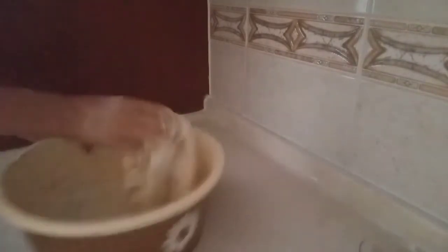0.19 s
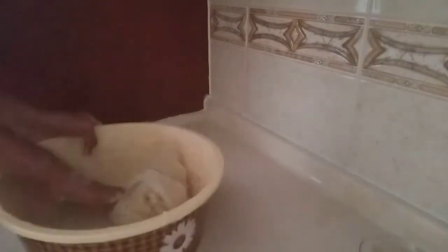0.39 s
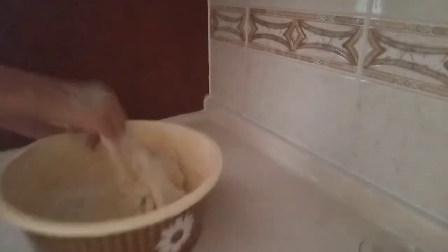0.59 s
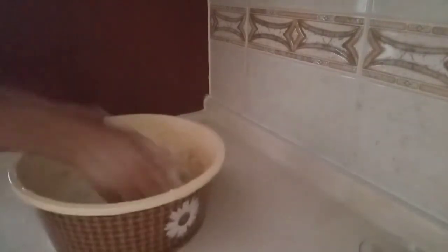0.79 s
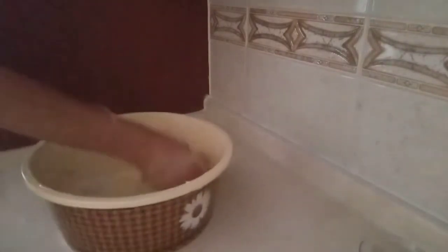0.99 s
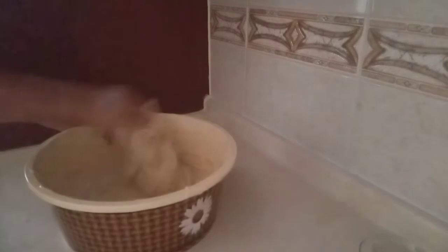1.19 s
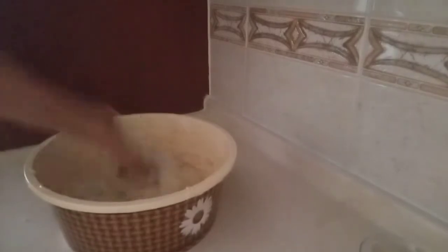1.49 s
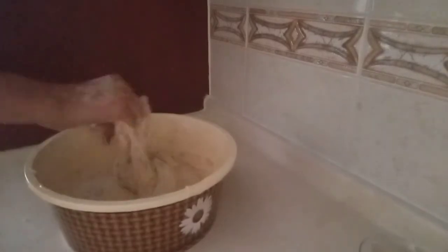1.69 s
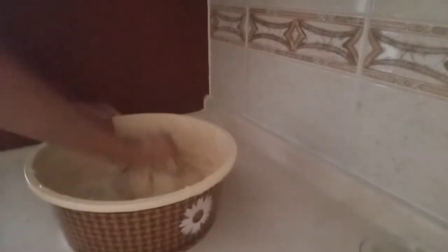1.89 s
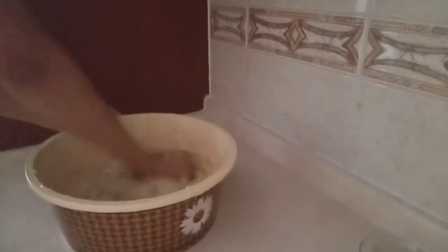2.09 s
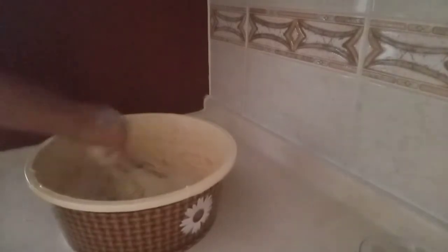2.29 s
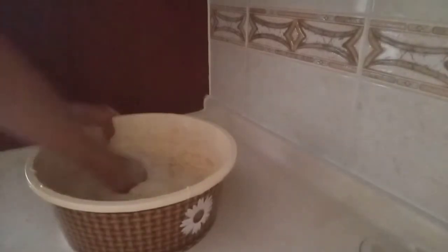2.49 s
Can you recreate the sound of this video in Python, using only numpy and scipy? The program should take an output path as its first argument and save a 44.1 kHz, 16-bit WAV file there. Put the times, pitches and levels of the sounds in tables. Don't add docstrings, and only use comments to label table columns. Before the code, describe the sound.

Hands knead sticky dough in a plastic bowl that knocks hard once on a kitchen counter

```python
import sys
import numpy as np
from scipy import signal
from scipy.fft import rfft, irfft
from scipy.io import wavfile
from scipy.ndimage import uniform_filter1d

SR = 44100
rng = np.random.default_rng(int(sys.argv[2]) if len(sys.argv) > 2 else 0)


def decibels_to_gain(level_db):
    exponent = np.asarray(level_db, float) / 20
    return 10 ** exponent


def dump_mix(stems):
    frames = np.atleast_2d(stems).T
    limited = np.clip(frames, -1, 1)
    pcm = np.round(limited * 32767).astype(np.int16)
    wavfile.write(sys.argv[1], SR, pcm)


N = 114660

# (frequency [Hz], level [dB], t60 [s])
WALL_MODES = [(380.4, -10, 0.13), (417.6, -8, 0.15), (465.4, -10.5, 0.11), (508, -9, 0.1), (563, -9, 0.1),
              (618.7, -7, 0.07), (711.8, -7, 0.13), (864.8, -1.5, 0.079), (900, -4, 0.05), (951, -5, 0.057),
              (1135, -7, 0.035), (1393, -9.5, 0.05), (1668, -7, 0.035), (1990, -6, 0.037)]
# (frequency [Hz], level [dB], t60 [s])
BASE_MODES = [(82.5, -8.5, 0.22), (96.7, -9.5, .15), (116.3, -1, 0.2), (174.05, -3.5, 0.2), (259, -16, 0.2),
              (323.7, -14.5, 0.076)]


def unit(x):
    return x / np.sqrt(np.mean(x ** 2))


def colour(x, points):
    hz, db = np.array(points, float).T
    freqs = np.fft.rfftfreq(len(x), 1 / SR)
    gain = decibels_to_gain(np.interp(np.log(freqs + 1), np.log(hz), db))
    return irfft(rfft(x) * gain, len(x))


def toned(x, points):
    return colour(x, points) / np.std(colour(rng.standard_normal(N), points))


def through(x, response):
    return signal.fftconvolve(x, response)[:N]


def walk(rate):
    hold = int(SR / rate)
    steps = np.repeat(rng.standard_normal(N // hold + 1), hold)
    return unit(uniform_filter1d(steps, hold)[:N])


def swell(t, start, rise, fall):
    u = t - start - rise
    rising = np.clip(1 + u / rise, 0, 1) ** 0.68
    falling = np.exp(-(np.maximum(u, 0) / fall) ** 1.104 * 2.24)
    return np.where(u < 0, rising, falling)


def grains():
    level_db = 2 * rng.exponential(size=N) + 1.5 * walk(49)
    return unit(rng.standard_normal(N) * decibels_to_gain(level_db))


def patches():
    crackle = grains()
    total = 0
    for hz in 500 * 1.5 ** np.arange(10):
        edges = [(hz / 1.5, -40), (hz / 1.2, 0), (hz * 1.2, 0), (hz * 1.5, -40)]
        total = total + colour(crackle, edges) * decibels_to_gain(3 * walk(35))
    return unit(total)


def ring(modes, flip):
    t = np.arange(SR // 2) / SR
    total = 0
    for k, (hz, db, t60) in enumerate(modes):
        sign = (-1) ** (k * flip)
        total = total + sign * decibels_to_gain(db - 60 * t / max(t60, .005)) * np.sin(2 * np.pi * hz * t)
    return total


def kitchen():
    # (frequency [Hz], level [dB per Hz])
    spectrum = [(20, -12), (60, -13), (108, 0.5), (170, -8.5), (400, -9), (2600, -26.5), (5310, -42.5),
                (15500, -51.5)]
    level_db = -68 + 1.8 * walk(6)
    return decibels_to_gain(level_db) * unit(colour(rng.standard_normal(N), spectrum))


def bird(t):
    u = np.clip((t - 1.83) / .08, 0, 1)
    pitch_hz = 5950 + 25 * walk(300)
    level = decibels_to_gain(-88 + 2.9 * walk(200)) * np.sin(np.pi * u ** 2)
    return level * np.sin(2 * np.pi * np.cumsum(pitch_hz) / SR)


def tick(t):
    return decibels_to_gain(-68) * np.exp(-((t - 2.519) / .0015) ** 2) * np.sin(2 * np.pi * 4200 * t)


def room():
    # (frequency [Hz], t60 [s])
    decay = [(550, 0.43), (900, 0.46), (2000, 0.29), (4500, 0.51), (10000, 0.15)]
    gap_s = 0.0063
    t = np.arange(SR // 2) / SR
    tail = 0
    for hz, t60 in decay:
        edges = [(hz / 2.5, -30), (hz / 2.2, 0), (hz * 1.2, 0), (hz * 5.6, -30)]
        band = colour(rng.standard_normal(len(t)), edges)
        tail = tail + band * decibels_to_gain(-60 * t / t60) / np.sqrt(t60 * SR / 14)
    tail = tail * decibels_to_gain(-8) * np.clip(t / gap_s - 1, 0, 1)
    tail[0] = 1
    return tail


def rub(force, modes, flip):
    return through(force * grains(), unit(ring(modes, flip)) / np.sqrt(SR // 2))


def drags(t):
    # (start [s], rise [s], fall [s], wall level [dB], base level [dB])
    strokes = [(-.05, 0.027, 0.11, -51.5, -43), (0.048, 0.06, 0.067, -57.5, -78),
               (.4, 0.035, 0.074, -81, -41), (0.617, 0.011, 0.1, -46.5, -54.5),
               (0.825, 0.12, 0.11, -86.5, -54), (.9, 0.025, 0.038, -70, -48),
               (1.03, 0.053, 0.38, -70.5, -67), (1.253, 0.0076, 0.08, -53, -48),
               (1.275, 0.054, 0.11, -55, -43), (1.35, 0.014, 0.043, -49, -56),
               (1.4, 0.029, 0.068, -57.5, -60), (1.55, 0.049, 0.042, -66.5, -91.5),
               (1.908, 0.025, 0.089, -59.5, -55), (1.978, 0.023, 0.076, -58, -70),
               (2.099, 0.026, 0.26, -67, -60), (2.428, 0.011, 0.076, -78.5, -49.5),
               (2.57, 0.017, 0.053, -63, -48)]
    wall = sum(decibels_to_gain(wall_db) * swell(t, s, rise, fall) for s, rise, fall, wall_db, _ in strokes)
    base = sum(decibels_to_gain(base_db) * swell(t, s, rise, fall) for s, rise, fall, _, base_db in strokes)
    return rub(wall, WALL_MODES, flip=True) + rub(base, BASE_MODES, flip=False)


def judders(t):
    # (start [s], rise [s], fall [s], level [dB], frequency [Hz])
    tones = [
        (.594, .008, .08, -42, 378),
        (.688, .012, .03, -48, 570),
        (.69, .02, .05, -46, 395),
        (.735, .035, .012, -45, 390),
        (1.268, .006, .012, -44, 880),
        (1.355, .005, .03, -41, 575),
        (1.384, .006, .03, -38, 730),
        (2.068, .005, .02, -40, 410),
        (2.09, .01, .06, -50, 500),
        (2.419, .004, .04, -46, 600),
    ]
    turn = 2 * np.pi * np.cumsum(1 + .06 * walk(260)) / SR
    flutter = decibels_to_gain(2.5 * walk(70.96))
    total = sum(decibels_to_gain(db) * swell(t, s, rise, fall) * np.sin(hz * turn) for s, rise, fall, db, hz in tones)
    return signal.sosfilt(signal.butter(4, 1300, fs=SR, output="sos"), flutter * total)


def smears(t):
    # (start [s], rise [s], fall [s], hiss level [dB], brightness [dB])
    strokes = [(-.1, .17, 0.54, -53, -3), (0.191, 0.079, 0.042, -52.5, -4),
               (0.252, 0.024, 0.025, -54, -6.5), (0.351, 0.0087, 0.04, -45.5, -7.5),
               (0.452, 0.21, 0.25, -55.5, -1), (0.606, 0.11, .06, -54, -2.5), (.71, 0.013, 0.017, -83, -15),
               (0.83, 0.026, 0.44, -52.5, -7.5), (0.897, 0.057, 0.097, -48.5, -0.5),
               (1.032, 0.097, 0.2, -64.5, -9), (1.248, 0.091, 0.088, -52.5, -8),
               (1.388, 0.016, 0.042, -53.5, 9), (1.493, 0.0226, 0.023, -61.5, 9.5),
               (1.53, 0.0277, 0.058, -70.5, 17.5), (1.898, 0.02, 0.028, -61, 11),
               (1.916, 0.036, 0.037, -58, 13.5), (1.973, 0.0095, 0.051, -54.5, -4.5),
               (2.06, 0.019, 0.027, -60.5, 0), (2.091, 0.042, 0.046, -64, 4), (2.139, 0.022, 0.15, -62, 3),
               (2.39, 0.043, 0.057, -60.5, 0), (2.473, 0.028, 0.15, -76.5, 6), (2.587, 0.0184, .05, -66, 3)]
    # (frequency [Hz], level [dB per Hz])
    spectrum = [(290, -41), (500, -4), (577, -3), (1170, -5), (2070, -9.5), (3580, -14), (5750, -29),
                (8720, -32.5), (15500, -36.5)]
    split_hz = 4140
    body = sum(decibels_to_gain(db) * swell(t, s, rise, fall) for s, rise, fall, db, _ in strokes)
    air = sum(decibels_to_gain(db + lift_db) * swell(t, s, rise, fall) for s, rise, fall, db, lift_db in strokes)
    low = signal.sosfilt(signal.butter(2, split_hz, "low", fs=SR, output="sos"), body * patches())
    high = signal.sosfilt(signal.butter(2, split_hz, "high", fs=SR, output="sos"), air * patches())
    return toned(low + high, spectrum)


def burst(t, start, db, t60, rise):
    return decibels_to_gain(db - 60 * np.maximum(t - start, 0) / t60) * np.clip((t - start) / rise, 0, 1)


def slaps(t):
    # (time [s], level [dB], t60 [s])
    hits = [
        (0.2245, -32, 0.04),
        (.362, -52, .05),
        (0.832, -59, .04),
        (0.885, -47, 0.045),
        (1.245, -65, .03),
        (1.312, -56.5, 0.032),
        (1.386, -35, 0.061),
        (2.151, -63.5, 0.07),
    ]
    # (frequency [Hz], level [dB per Hz])
    spectrum = [(590, -41), (1000, -23), (1660, -16), (1880, -7.5), (3740, -5.5), (5150, -18),
                (9250, -30.5), (15500, -44)]
    rise_s = .002
    envelope = 0
    for s, db, t60 in hits:
        echo = burst(t, s, db - 17, .35, rise_s)
        envelope = envelope + burst(t, s, db, t60, rise_s) + echo
    return toned(envelope * rng.standard_normal(N), spectrum)


def knock(t):
    # (frequency [Hz], level [dB per Hz])
    spectrum = [(110, -41.5), (300, -19), (480, -11), (920, -3), (1300, -11.5), (2100, -10), (3500, -31.5),
                (12000, -85)]
    start_s, level_db, rise_s = .2256, -13.5, .0005
    envelope = burst(t, start_s, level_db, .12, rise_s)
    envelope = envelope + burst(t, start_s, level_db - 7.5, 0.42, rise_s)
    return toned(envelope * rng.standard_normal(N), spectrum)


def struck_wall(wall_db, contact_ms):
    modes = []
    for hz, db, t60 in WALL_MODES:
        struck_hz = hz * (1 + .01 * rng.standard_normal())
        struck_db = db + wall_db + 2 * rng.standard_normal()
        damped_t60 = min(t60, 130 / hz) / (1 + .5 * contact_ms)
        modes.append((struck_hz, struck_db, damped_t60))
    wall = ring(modes, flip=True)
    k = np.arange(900)
    rattle = decibels_to_gain(-23.5) * rng.standard_normal(900) * np.exp(-k / SR / 0.0049)
    rattle[0] += 1
    return signal.fftconvolve(wall, rattle)[:len(wall)]


def struck_base(base_db, contact_ms):
    modes = []
    for hz, db, t60 in BASE_MODES:
        tilt_db = 2.5 * np.log2(hz / 150) / max(contact_ms, .2)
        modes.append((hz, db + base_db + 2 * rng.standard_normal() + tilt_db, t60))
    return ring(modes, flip=False)


def blows():
    # (time [s], base level [dB], wall level [dB], contact [ms])
    hits = [(0.2255, -20, -8.5, 0.21), (.2405, -50, -14.5, 0.44), (.276, -31, -19.5, 0.65),
            (.303, -53, -21, 0.26), (.327, -40.5, -33, 0.19), (.356, -50, -29, 0.4),
            (.371, -25.5, -28.5, 1.76), (.597, -54.5, -39, 0.89), (0.833, -48.5, -62, 3.0),
            (0.849, -50, -72, 7.6), (0.873, -30.5, -22, 2.63), (.886, -66, -33, 0.12),
            (0.942, -46, -70, 0.21), (.927, -41, -44.5, 1.16), (1.272, -50.5, -41.5, 1.28),
            (1.314, -38, -64, 6.9), (1.359, -35.5, -38.5, 1.1), (1.38, -36, -43.5, 1.26),
            (1.387, -49, -36, 0.66), (1.429, -40, -47, 1.64), (1.907, -57.5, -57, 2.2),
            (1.945, -40.5, -63, 3.9), (1.994, -39, -38.5, 2.3), (2.067, -33.5, -27, 1.86),
            (2.083, -59, -33.5, 1.74), (2.102, -53, -52, 2.1), (2.122, -52, -58, 3.5),
            (2.138, -42.5, -39, 2.5), (2.419, -41.5, -38, 1.43), (2.472, -68.5, -66.5, 1.55),
            (2.573, -37.5, -41.5, 1.18)]
    out = np.zeros(N)
    for s, base_db, wall_db, contact_ms in hits:
        i = int(s * SR)
        width = max(contact_ms, .1) * SR / 1000
        k = np.arange(int(width) + 2) + i - s * SR + 1
        push = np.sin(np.pi * np.clip(k / width, 0, 1)) ** 2
        body = struck_base(base_db, contact_ms) + struck_wall(wall_db, contact_ms)
        hit = signal.fftconvolve(body, push / push.sum())[:N - i]
        out[i:i + len(hit)] += hit
    return out


def scene():
    t = np.arange(N) / SR
    bowl = blows() + smears(t) + drags(t) + judders(t)
    bursts = slaps(t) + knock(t)
    background = kitchen() + bird(t) + tick(t)
    return (through(bowl, room()) + bursts + background)[None]


def top_cut(x):
    return signal.sosfilt(signal.butter(12, 15530, fs=SR, output="sos"), x)


def record(dry):
    port_hz, port_width_hz, port_db = 8650, 760, 9
    ceiling = .8
    b, a = signal.iirpeak(port_hz, port_hz / port_width_hz, fs=SR)
    x = dry + decibels_to_gain(port_db) * signal.lfilter(b, a, dry)
    x = signal.sosfilt(signal.butter(6, 67, "high", fs=SR, output="sos"), x)
    return top_cut(ceiling * np.tanh(x / ceiling))


dry = scene()
out = record(dry)
dump_mix(out)
```